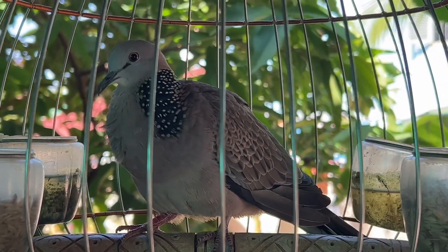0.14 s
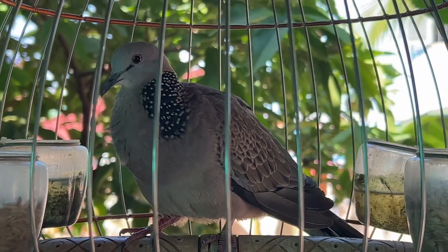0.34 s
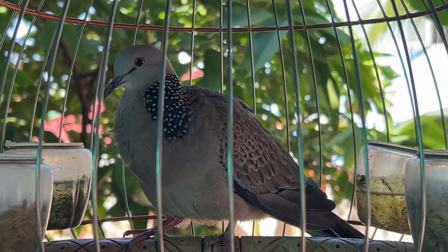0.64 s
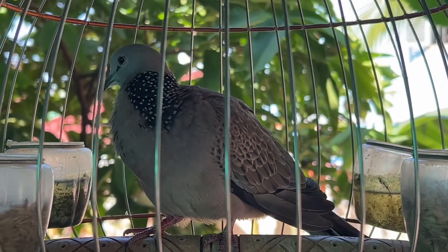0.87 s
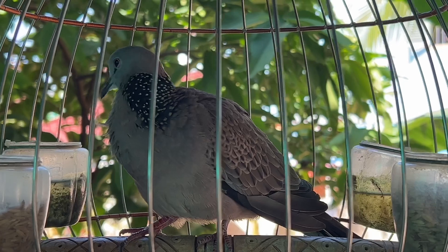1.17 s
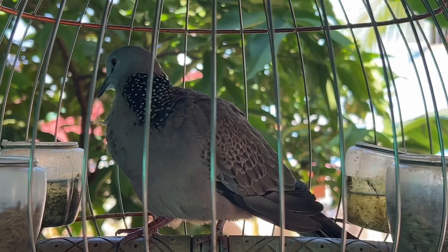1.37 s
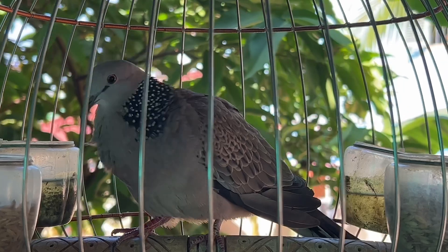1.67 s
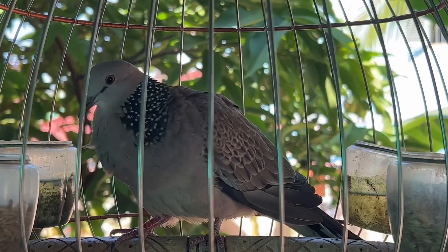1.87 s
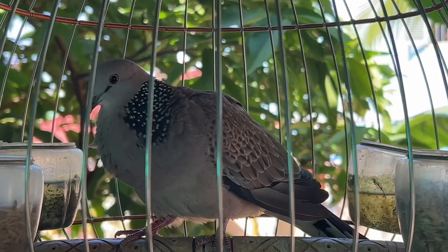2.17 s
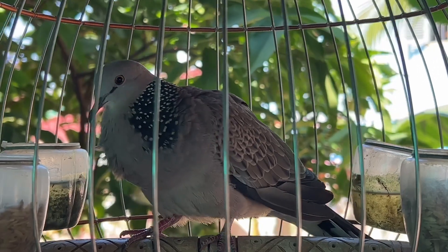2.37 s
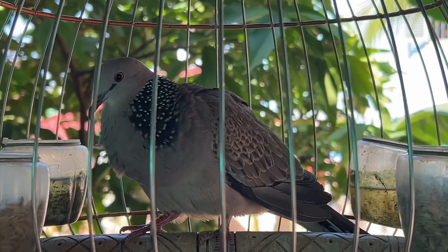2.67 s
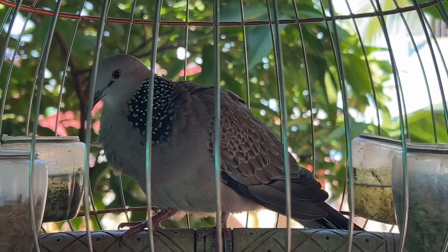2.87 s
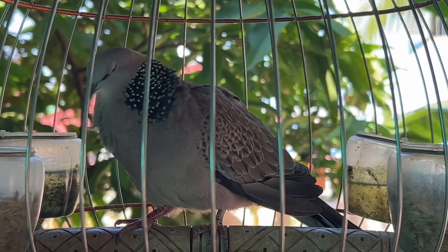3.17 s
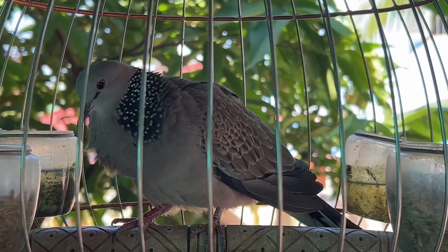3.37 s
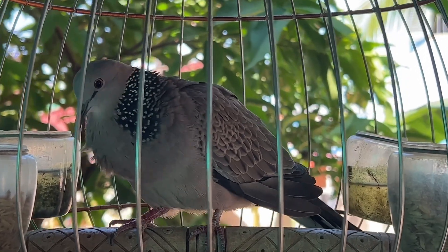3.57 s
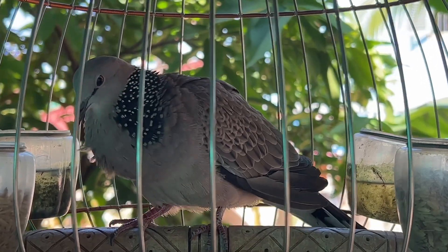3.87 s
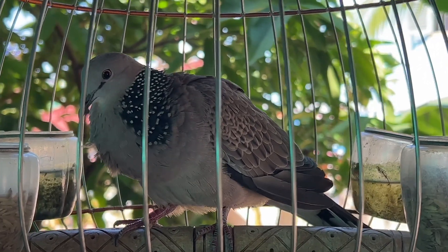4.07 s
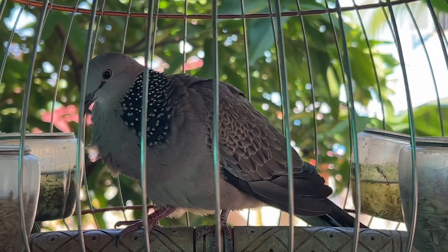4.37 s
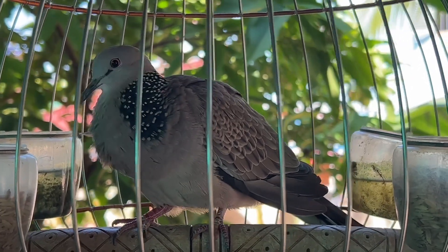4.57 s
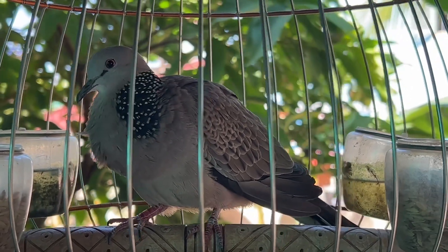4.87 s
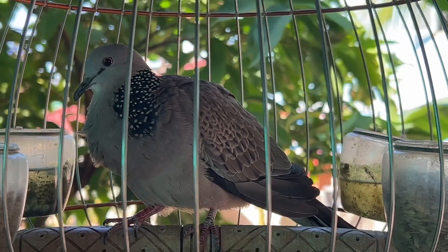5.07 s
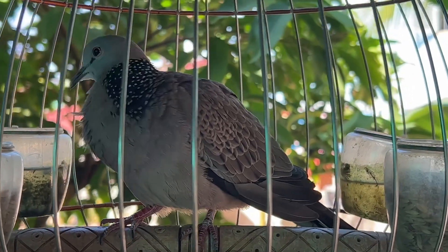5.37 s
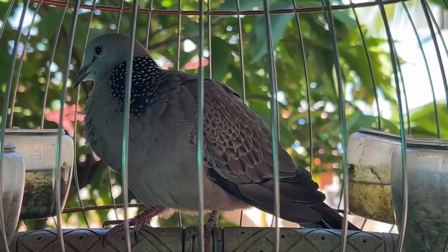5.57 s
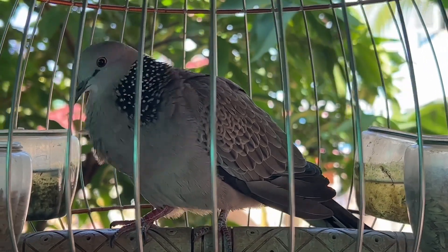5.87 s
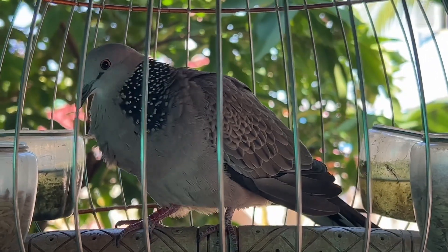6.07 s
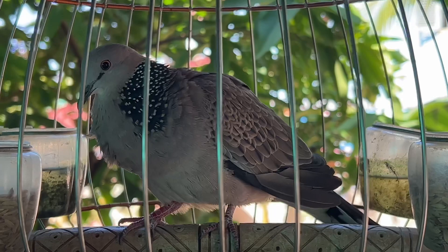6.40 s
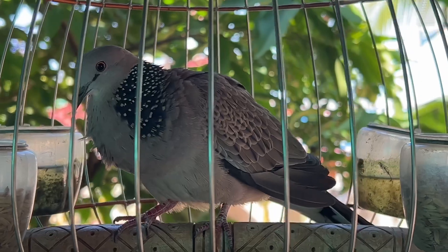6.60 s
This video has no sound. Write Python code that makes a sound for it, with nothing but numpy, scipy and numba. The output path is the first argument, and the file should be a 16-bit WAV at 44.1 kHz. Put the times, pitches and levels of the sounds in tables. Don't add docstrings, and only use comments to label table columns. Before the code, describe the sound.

A close, nearly dry phone pickup in a garden beside a road. Low engine drone and soft traffic wash run throughout, swelling slightly at first and thinning until about 5.5 s. A far hoarse fowl clucks at 0.1 s and gives a wavering call from 0.3 to 0.8 s. The dove's first, softest coo starts at 1.55 s: a brief hop, a fluttered rise at 1.7 s, then a long pulsing trill from 2.05 to 2.6 s, sliding down. Faint bird whistles and dry scuffs overlap it. The second coo runs from 3.2 to 4.2 s. Light metal ticks begin near 5 s, growing into scraping bowl knocks from 5.35 s. The third coo, from 5.75 s to the end, is strongest, with a sharp clank at 5.9 s, ringing cup taps at 6.15 to 6.3 s and 6.7 s, and an engine approaching.

```python
import sys
import numpy as np
from scipy import signal
from scipy.fft import rfft, irfft
from scipy.io import wavfile
from scipy.ndimage import uniform_filter1d
from numba import njit

SR = 44100
rng = np.random.default_rng(int(sys.argv[2]) if len(sys.argv) > 2 else 0)


def transcribe(signal):
    frames = np.atleast_2d(signal).T
    limited = np.clip(frames, -1, 1)
    pcm = np.round(limited * 32767).astype(np.int16)
    wavfile.write(sys.argv[1], SR, pcm)


def undo_db(level):
    steps = np.asarray(level, float) / 20
    return 10 ** steps


N = 297234
T = np.arange(N) / SR

# (time [s], level [dB])
TRAFFIC = [(0.0, 0), (0.5, 1.5), (1.35, -4.5), (2.53, 0), (3.17, -5), (3.62, -8), (4.34, -10), (5.5, -11.5),
           (6.2, -3.5), (6.74, -4)]
# (frequency [Hz], density [dB per Hz])
WASH_COLOUR = [(40, 0), (118, -1), (222, -14), (460, -22.5), (800, -22.5), (1600, -29), (3130, -36.5),
               (6800, -38), (8800, -47), (10200, -51.5), (11600, -53.5), (13500, -50.5), (16500, -59)]
# (frequency [Hz], side level [dB])
WASH_WIDTH = [(40, -33), (110, -16.5), (200, -8.5), (500, -2), (1300, 0), (2400, -7.5), (4400, -25.5),
              (8000, -13)]
# (time [s], firing rate [Hz], level [dB])
LEAVING = [(0.0, 26.8, -43), (0.8, 26.5, -43), (1.5, 26.2, -41), (2.0, 25.0, -43), (2.5, 24.0, -52)]
WAITING = [(1.8, 21.5, -52), (2.3, 20.5, -47), (2.9, 20.2, -42), (3.35, 19.6, -43), (3.7, 20.0, -49),
           (4.4, 20.1, -52), (4.7, 20.3, -60)]
COMING = [(3.6, 34.93, -51.5), (4.4, 36.78, -47), (5.12, 38.4, -48.5), (5.98, 38.45, -49),
          (6.54, 39.85, -36), (6.74, 38.97, -33.5)]
IDLING = [(0, 52.9, -42), (1.0, 52.5, -39), (2.2, 53.3, -46)]
# (multiple [-], level [dB])
LEAVING_ORDERS = [(1, -18.5), (2, -7.5), (3, -6), (4, -3.5), (5, -4), (6, -1.5), (7, -9), (8, -20)]
WAITING_ORDERS = [(2, -7.5), (3, -11.5), (4, -6), (5, -0.5), (6, -1.5), (7, -6), (8, -9), (9, -13)]
COMING_ORDERS = [(1, -10), (2, 0.5), (3, -16), (4, -7.5), (5, -21.5), (6, -29)]
# (time [s], pitch [Hz], level [dB], second harmonic level [dB])
FOWL_CALLS = [
    [(.13, 505, -50, -60), (.155, 519.5, -46, -51), (.18, 502, -60, -62)],
    [(.31, 538, -42, -36), (.365, 534, -39, -37), (.392, 548, -43, -36), (.425, 541, -50, -47),
     (.45, 559, -44, -50), (.52, 560, -44.5, -47), (.57, 572, -40.5, -43), (.63, 569, -42.5, -47),
     (.7, 544, -42, -54), (.752, 502.6, -46, -54), (.8, 432.5, -49.5, -60)],
]
# (time [s], pitch [Hz], level [dB])
WHISTLES = [
    [(1.67, 1537, -65), (1.682, 1614, -39), (1.724, 1757, -40), (1.8, 1683, -49)],
    [(1.9, 1577, -45), (1.948, 1732, -45), (1.975, 1670, -57), (1.995, 1600, -48.5)],
    [(2.11, 1732, -66), (2.124, 1684, -40), (2.16, 1830, -59)],
    [(2.24, 1740, -58), (2.268, 1796, -52.5), (2.402, 1740, -47), (2.48, 1648, -65)],
]
# (time [s], level [dB])
HOPS = [
    (1.548, -3),
    (3.199, 1),
    (5.748, 0.5),
]
# (time from hop start [s], pitch [Hz], level [dB])
HOP_SHAPE = [(-.007, 335.5, -47), (.001, 396, -32.5), (.013, 475, -25.5), (.028, 509, -18.5),
             (.046, 522, -16), (.068, 507, -18), (.082, 465, -28.5)]
# (time [s], pitch [Hz], level [dB])
RISES = [
    [(1.728, 440, -34), (1.762, 555, -18.5), (1.795, 566, -15.5), (1.835, 574.3, -14), (1.853, 562, -14),
     (1.877, 530.4, -15), (1.884, 480, -26.5), (1.891, 411, -39)],
    [(3.343, 449.8, -33.5), (3.38, 535, -19.5), (3.41, 572, -14), (3.445, 566, -15), (3.468, 555, -17),
     (3.49, 528.7, -15), (3.498, 479, -28), (3.506, 411, -39.5)],
    [(5.919, 440, -33.5), (5.955, 535, -17.5), (5.99, 566.3, -14), (6.025, 580.4, -10.5), (6.05, 565, -13),
     (6.072, 525, -15), (6.077, 481, -26.5), (6.083, 410.6, -39.5)],
]
# (time [s], pitch [Hz], level [dB])
LONGS = [
    [(2.05, 500, -26), (2.084, 590, -13.5), (2.11, 618, -9.5), (2.19, 628, -9.5), (2.258, 612, -10),
     (2.285, 580, -14.5), (2.43, 507, -19), (2.55, 463, -30.5), (2.625, 432, -34)],
    [(3.675, 500, -26.5), (3.709, 600, -13.5), (3.735, 630, -9), (3.815, 634, -10), (3.9, 605, -10.5),
     (3.965, 554, -14.5), (4.055, 510, -17.5), (4.145, 477, -26), (4.215, 440, -34.5)],
    [(6.247, 512, -25), (6.281, 595, -12), (6.32, 648, -8), (6.38, 640, -8.5), (6.47, 615, -9.5),
     (6.51, 555, -14.5), (6.6, 517, -17.5), (6.68, 486, -24), (6.76, 455, -31.5)],
]
# (time [s], share shut [0-1], length [s])
TRILL_PINCHES = [(2.071, 0.76, 0.0059), (2.0932, 0.79, 0.011), (2.118, 0.84, 0.011), (2.1395, 0.73, 0.013),
                 (2.164, 0.78, 0.012), (2.1876, 0.88, 0.011), (2.2105, 0.74, 0.011), (2.2302, 0.93, 0.008),
                 (2.248, 0.57, 0.0041), (2.269, 0.61, 0.009), (2.286, 0.5, 0.0064), (2.307, 0.7, 0.0054),
                 (2.322, 0.51, 0.0064), (2.338, 0.3, 0.0049), (2.348, 0.2, 0.0064), (2.367, 0.16, 0.0072),
                 (2.381, 0.24, 0.0062), (3.6967, 0.71, 0.0062), (3.7182, 1, 0.01), (3.743, 0.88, 0.0112),
                 (3.765, 0.85, 0.0114), (3.786, 0.93, 0.011), (3.8071, 0.95, 0.0063), (3.8292, 0.79, 0.011),
                 (3.8474, 0.8, 0.0064), (3.867, 0.86, 0.0089), (3.885, 0.71, 0.0063), (3.902, 0.75, 0.0052),
                 (3.92, 0.1, 0.0037), (3.9327, 0.8, 0.0064), (3.948, 0.5, 0.0059), (3.9624, 0.22, 0.0045),
                 (3.975, 0.22, 0.006), (3.991, 0.34, 0.0045), (4.021, 0.1, 0.0072), (6.2712, 0.84, 0.0064),
                 (6.29, 1, 0.0085), (6.3116, 0.99, 0.0099), (6.3345, 0.89, 0.0109), (6.3572, 0.82, 0.011),
                 (6.3808, 0.95, 0.0113), (6.4033, 0.98, 0.012), (6.4222, 0.67, 0.008),
                 (6.4412, 0.8, 0.0049), (6.4602, 0.78, 0.0076), (6.479, 0.79, 0.008), (6.514, 0.2, 0.02),
                 (6.575, 0.1, 0.008), (6.64, .12, 0.012)]
FLUTTER_PINCHES = [(1.7347, 0.42, 0.0017), (1.7486, 0.65, 0.0019), (1.762, 0.67, 0.0026),
                   (1.772, 0.54, 0.0059), (1.785, 0.34, 0.0037), (3.337, 0.67, 0.0051),
                   (3.351, 0.75, 0.0026), (3.3625, 0.36, 0.0025), (3.3761, 0.51, 0.0046),
                   (3.387, 0.47, 0.0046), (3.4002, 0.71, 0.0041), (3.4115, 0.69, 0.0041),
                   (3.4214, 0.37, 0.0053), (5.9084, 0.55, 0.003), (5.917, 0.62, 0.0021),
                   (5.9253, 0.64, 0.0017), (5.9374, 0.41, 0.0038), (5.9525, 0.61, 0.0051),
                   (5.9626, 0.22, 0.0037), (5.9723, 0.24, 0.0045), (5.982, 0.24, 0.0039)]
CLOSING_PINCHES = [(1.626, 0.62, 0.013), (1.864, 0.48, .013), (3.265, 0.3, .005), (3.287, .7, .005),
                   (3.298, .6, .004), (3.31, 0.55, 0.0043), (3.476, 0.23, 0.02), (5.83, .65, 0.01),
                   (6.061, 0.4, 0.014)]
# (time [s], frequency [Hz], level [dB], T60 [s])
PINGS = [(2, 5900, -51, 0.074), (4.984, 2470, -49, 0.16), (4.99, 1340, -57, 0.27), (4.986, 3850, -53, .5),
         (4.99, 3780, -56, .45), (5.04, 3820, -55, .3), (4.4, 6627, -55, .2), (4.985, 6400, -55, 0.13),
         (5.322, 7640, -53, 0.23), (5.354, 4350, -47, .15), (5.56, 11730, -54.5, 0.43),
         (5.14, 7000, -59, 0.25), (5.178, 7500, -60, 0.28), (5.43, 2450, -43, 0.14),
         (5.512, 2300, -45, 0.16), (5.44, 1910, -47, .14), (5.395, 3860, -48, .45), (5.558, 1868, -43, .35),
         (5.56, 3500, -46, .3), (5.57, 4350, -46, .25), (5.783, 1776, -53, .3), (5.888, 4290, -34, .3),
         (5.888, 4194, -40, .3), (5.895, 3800, -39.5, .4), (5.89, 2480, -40.5, .4), (5.89, 1868, -44.5, .4),
         (5.892, 3480, -42, .25), (5.9, 6605, -43.5, .3), (5.6, 5530, -54, .5), (5.648, 5545, -49, .14),
         (6.045, 5290, -52, .4), (6.075, 5290, -51, 0.3), (6.18, 9250, -41, 0.25), (6.7, 4160, -39, .13),
         (6.21, 5260, -49.5, .35), (6.16, 4200, -39.5, .2), (6.162, 4570, -44, .2),
         (6.283, 2370, -45.5, 0.43), (6.275, 4570, -47, .4), (4.982, 2480, -56, .4), (5.36, 1900, -50, .25),
         (5.0, 5500, -56, .15)]
# (time [s], level [dB], decay [s], centre [Hz])
SCUFFS = [(2.021, -45, 0.058, 3790), (2.283, -45.5, 0.065, 4340), (2.556, -51, 0.21, 1150),
          (2.72, -54.5, .3, 1240), (3.495, -61.5, 0.097, 5950), (4.159, -52.5, 0.03, 3970),
          (4.638, -48.5, 0.043, 4500), (5.36, -51, .12, 2300), (5.558, -49, .06, 2400),
          (5.888, -41, .08, 2700), (5.888, -43, .07, 6200), (6.04, -50, .08, 2600), (6.158, -49, .07, 4600),
          (6.28, -51, .12, 3600), (5.41, -54, 1, 4366), (5.942, -31, 0.023, 11100)]
PLACES = ["edge", "rim", "wall", "base"]
# (frequency [Hz], level struck at edge [dB], rim [dB], wall [dB],
# base [dB])
BOWL_MODES = [(1330, -15, -20, -30, -32), (1865, -26, -8, -3, -6), (1933, -29, -8, -13, -16),
              (2290, -22, -16, -18, -18), (2470, -9, -8, -8, -6), (3510, -15, -10, -4, -8),
              (3645, -26, -18, -21, -12), (3725, -13, -11, -23, -16), (3805, -2, -18, -11, 0),
              (3855, 0, 0, -21, -6), (4185, -30, -16, -11, -4), (4290, -31, -10, -7, 6),
              (4350, -33, 3, -6, -8), (4450, -28, -6, -18, -10),
              (5290, -29, -18, -7, -18), (5520, -14, -5, -7, -13), (6220, -31, -10, -12, -24),
              (6380, -33, -5, -14, -17), (6610, -16, -14, -17, -5), (6900, -32, -8, -16, -13),
              (7300, -23, -12, -21, -14), (8055, -35, -10, -9, -18), (8385, -33, -2, -17, -9),
              (10980, -28, -23, -29, -27), (11730, -22, -12, -10, -22), (14300, -45, -45, -30, -42)]
CUP_MODES = [(2000, -19, -28, -28, -24), (2370, -20, -19, -19, -19), (4175, -21, -6, -28, -26),
             (4568, -16, -6, -13, -24), (4915, -16, -14, -20, -21), (5260, -18, -8, -15, -18),
             (6945, -17, -10, -12, -3), (6998, -5, -7, -9, 0), (7060, -28, -24, -14, -3),
             (7630, 0, -10, 0, -4), (7690, -23, -36, -7, -10), (8685, -21, -25, -5, -18),
             (9200, -1, 0, -18, -20), (10420, -17, -45, -29, -28), (10575, 0, -19, -29, -16),
             (11185, -45, -16, -2, -7), (11270, -45, -18, -21, -14), (14630, -17, -29, -29, -23),
             (14870, -36, -27, -20, -16)]
# (time [s], place struck, level [dB], chatter [s], T60 [s], grind level [dB])
BOWL_KNOCKS = [(4.979, "edge", -52, 0.013, 0.23, -26), (5.149, "rim", -67, 0.082, 0.25, -19),
               (5.356, "rim", -46.5, 0.031, 0.23, 5), (5.392, "rim", -42.5, 0.021, 0.18, -2),
               (5.432, "wall", -52, 0.012, .11, 2), (5.48, "rim", -57, 0.023, .12, 0),
               (5.525, "edge", -51.5, .01, 0.15, -9), (5.555, "wall", -39.5, 0.016, 0.16, -2.5),
               (5.615, "wall", -54.5, .01, 0.17, -8), (5.655, "rim", -70, 0.0105, 0.18, -6),
               (5.884, "base", -29, 0.014, 0.17, -6.5), (5.912, "base", -37.5, 0.008, 0.12, 0),
               (5.935, "edge", -36.5, 0.0086, 0.12, 0), (5.955, "wall", -45, 0.018, 0.13, 7),
               (5.989, "base", -54, .01, .12, -5), (6.041, "rim", -53, 0.025, 0.14, 5.5)]
CUP_KNOCKS = [
    (5.775, "edge", -36, 0.0068, 0.71, -10),
    (6.156, "rim", -36.5, 0.008, 0.23, -3),
    (6.271, "base", -36.5, 0.018, 0.25, -7),
    (6.305, "wall", -32.5, 0.026, 0.18, -10),
    (6.696, "base", -42.5, 0.0048, 0.26, -5),
]
# (frequency [Hz], left lead [rad])
PORT_LEAD = [(0, 0), (8950, 0), (9600, -3.05), (10430, -3.3), (10750, -4.1), (11800, -6.3), (12500, -6.2),
             (13300, -9.2), (14400, -9.8), (15200, -12.6)]
# (frequency [Hz], gain [dB])
HOUSING = [(25, -23.5), (45, 0), (15500, 4), (16000, -26.5)]


def walk(rate_hz):
    k = int(SR / rate_hz)
    held = np.repeat(rng.standard_normal(N // k + 1), k)
    return 1.39 * uniform_filter1d(uniform_filter1d(held, k), k)[:N]


def band(x, hz, octaves):
    edges = np.clip(hz * 2 ** (np.array([-.5, .5]) * octaves), 10, .49 * SR)
    sos = signal.butter(2, edges, "band", fs=SR, output="sos")
    return signal.sosfilt(sos, x) / np.sqrt(np.ptp(edges) / (SR / 2))


def tone(hz, multiple=1):
    phase = 2 * np.pi * multiple * np.cumsum(hz) / SR
    return np.sqrt(2) * np.sin(phase + 2 * np.pi * rng.random())


def track(spans, off_db=-110, gap_s=.02):
    rows = []
    for k, span in enumerate(spans):
        first, last = span[0], span[-1]
        off = (off_db,) * (len(first) - 2)
        if k == 0 or first[0] - spans[k - 1][-1][0] > gap_s:
            rows.append((first[0] - .007, first[1]) + off)
        rows += span
        if k == len(spans) - 1 or spans[k + 1][0][0] - last[0] > gap_s:
            rows.append((last[0] + 0.01034, last[1]) + off)
    s, *columns = np.transpose(rows)
    return [np.interp(T, np.maximum.accumulate(s), c) for c in columns]


def on_log_hz(hz, table):
    table_hz, db = np.transpose(table)
    return np.interp(np.log(hz), np.log(table_hz), db)


def road():
    near_db = np.interp(T, *np.transpose(TRAFFIC))
    rumble_lag_s = 2.6
    rumble_db = -44 + 0.77 * uniform_filter1d(near_db, size=int(rumble_lag_s * SR))
    roar_db = -54.5 + near_db
    hiss_db = -58.5 + 0.96 * near_db
    out = 0
    for hz in 30 * 2 ** np.arange(0, 9.2, .5):
        if hz < 250:
            level_db, ref_hz = rumble_db, 100
        elif hz < 1800:
            level_db, ref_hz = roar_db, 1000
        else:
            level_db, ref_hz = hiss_db, 4500
        level_db = level_db + 1.2 * (hz > 9000) * (hiss_db - hiss_db[0])
        colour_db = on_log_hz(hz, WASH_COLOUR) - on_log_hz(ref_hz, WASH_COLOUR) + 10 * np.log10(hz / ref_hz)
        mid = band(rng.standard_normal(N), hz, 0.51)
        side = undo_db(on_log_hz(hz, WASH_WIDTH)) * band(rng.standard_normal(N), hz, 0.51)
        gain = undo_db(level_db + colour_db + walk(9.6))
        out = out + gain * (mid + side * np.array([[1], [-1]]))
    return out


def engine(run, orders, sway_db=1.8):
    hz, db = track([run])
    hz = hz * (1 + 0.0033 * walk(5.99))
    return undo_db(db) * sum(undo_db(d + sway_db * walk(3.11)) * tone(hz, multiple=m) for m, d in orders)


def far_birds():
    hz, db, octave_db = track(FOWL_CALLS)
    hz = hz * (1 + .014 * walk(90))
    fowl = undo_db(db) * (0.85 + 0.3 * walk(130)) * tone(hz)
    fowl = fowl + undo_db(octave_db) * (0.6 + .25 * walk(160)) * tone(hz, multiple=2)
    hz, db = track(WHISTLES)
    return fowl + undo_db(db) * (0.63 + 0.16 * walk(90)) * tone(hz * (1 + 0.0064 * walk(50)))


def phrases():
    out = []
    for (s, hop_db), rise, long_note in zip(HOPS, RISES, LONGS):
        hop = [(s + u, hz, db + hop_db) for u, hz, db in HOP_SHAPE]
        hop_end_s = hop[-1][0]
        wait_s = rise[0][0] - hop_end_s
        slack = (hop_end_s + wait_s / 2, 555 - 2100 * wait_s, -4 - 440 * wait_s)
        out += [hop + [slack] + rise, long_note]
    return out


def valve():
    overshoot, squareness = 1.12, 2.646
    open_share = np.ones(N)
    for s, shut, length_s in TRILL_PINCHES + FLUTTER_PINCHES + CLOSING_PINCHES:
        near = slice(int((s - .03) * SR), int((s + .03) * SR))
        off = 2 * np.abs(T[near] - s) / length_s
        open_share[near] *= 1 - overshoot * min(shut, 1) * .5 ** (off ** squareness)
    return uniform_filter1d(open_share, size=50)


def dove(octave_db=-58):
    sung = []
    for rows in phrases():
        s, end_hz, end_db = rows[-1]
        sung.append(rows + [(s + 0.009, 0.86 * end_hz, end_db - 4)])
    hz, db = track(sung)
    open_share = valve()
    sag = .13 * (1 - open_share)
    slide = 3.2 * np.gradient(uniform_filter1d(open_share, size=200))
    hz = hz * (1 - sag - slide) * (1 + 0.005 * walk(90))
    air = undo_db(np.minimum(db - 8.0, -50)) * band(rng.standard_normal(N), 625, 0.11)
    leak_db = np.minimum(db - 8, octave_db - .05 * (hz - 500))
    slack = 0
    for (s, _), rise in zip(HOPS, RISES):
        rise_s = rise[0][0]
        slack = slack + np.interp(T, [s + .075, s + .09, rise_s, rise_s + .02], [0, 1, 1, 0])
    leak_db = leak_db + 5 * slack
    open_share = open_share * (1 + .38 * slack * walk(150))
    half_shut = 4 * np.clip(open_share * (1 - open_share), 0, 1)
    rasp = undo_db(db - 33.5) * half_shut * band(rng.standard_normal(N), 796, 0.32)
    voice = undo_db(db + .3 * walk(70)) * tone(hz)
    octave = undo_db(leak_db + 4.1 * walk(30)) * tone(hz, multiple=2)
    return rasp + open_share * (air + voice + octave)


def pings():
    attack_s = .005
    out = np.zeros(N)
    for s, hz, db, t60_s in PINGS:
        u = np.clip(T - s, 0, 1)
        waver_db, drift = 3.2 * walk(90), .004 * walk(60)
        out += undo_db(db + waver_db - 60 * u / t60_s) * (1 - np.exp(-u / attack_s)) * tone(hz * (1 + drift))
    return out


def scuffs():
    out = np.zeros(N)
    for s, db, decay_s, centre_hz in SCUFFS:
        u = np.clip(T - s, 0, 1)
        shape = (1 - np.exp(-u / 0.00082)) * np.exp(-u / decay_s)
        out += undo_db(db + 3.2 * walk(70)) * shape * band(rng.standard_normal(N), centre_hz, 1.57)
    return out


def knocks(modes, hits):
    out = np.zeros(N)
    t = np.arange(SR // 2) / SR
    short = slice(0, SR // 5)
    for s, place, db, chatter_s, t60_s, grind_db in hits:
        grit = rng.standard_normal(len(t)) * (1 - np.exp(-t / 0.011))
        sparse = rng.random(len(t)) < .06
        taps = grit * sparse * (np.exp(-t / chatter_s) + 0.21 * np.exp(-t / 0.066))
        ring = 0
        for hz, *levels_db in modes:
            push = np.abs(np.sum(taps[short] * np.exp(2j * np.pi * hz * t[short])))
            push = max(push, 0.53 * np.sqrt(np.sum(taps ** 2)))
            push *= max(abs(np.cos(np.interp(hz, *np.transpose(PORT_LEAD)) / 2)), .35)
            mode_t60_s = .8 * np.clip(t60_s, .1, .38) * (hz / 5000) ** -.2
            fade = np.exp(-np.log(1000) * t / mode_t60_s)
            fade *= 1 + .45 * np.cos(2 * np.pi * (rng.uniform(8, 35) * t + rng.random()))
            gain = undo_db(0.71 * levels_db[PLACES.index(place)]) / push
            ring = ring + gain * np.sin(2 * np.pi * hz * t) * fade
        held = ring * t * np.exp(-t / .0011)
        held = held / np.sqrt(np.sum(held ** 2))
        slip_db = 2.2 * np.repeat(rng.standard_normal(len(t) // 200 + 1), 200)[:len(t)]
        rub = grit * undo_db(slip_db) * np.exp(-t / (chatter_s + 0.022))
        grind = signal.fftconvolve(rub, held)[:len(t)]
        struck = signal.fftconvolve(taps[short], ring)[:len(t)]
        hit = undo_db(db) * (struck + undo_db(grind_db) * grind)
        i = int(s * SR)
        out[i:i + len(t)] += hit[:N - i]
    return out


@njit
def walls(x, lags, gain, damp):
    line, soft, out = np.zeros((8, 8192)), np.zeros(8), np.zeros((2, len(x)))
    for i in range(len(x)):
        total = 0.
        for k in range(8):
            soft[k] += (1 - damp) * (gain[k] * line[k, (i - lags[k]) & 8191] - soft[k])
            total += soft[k]
            out[k % 2, i] += soft[k]
        for k in range(8):
            line[k, i & 8191] = x[i] + soft[k] - total / 4
    return out


def scene():
    motors = engine(LEAVING, LEAVING_ORDERS) + engine(WAITING, WAITING_ORDERS)
    motors = motors + engine(COMING, COMING_ORDERS) + engine(IDLING, [(0.99, 0.0091)])
    far, bird = far_birds(), dove()
    metal = pings() + scuffs() + knocks(BOWL_MODES, BOWL_KNOCKS) + knocks(CUP_MODES, CUP_KNOCKS)
    sent = undo_db(-23.5) * bird + undo_db(-8) * far + undo_db(-11.0) * metal + undo_db(-26.0) * motors
    yard_t60_s, yard_damp = 0.3, 0.13
    lags = rng.integers(250, 2000, 8)
    yard = walls(sent, lags, undo_db(-60 * lags / SR / yard_t60_s), yard_damp)
    slap_s = .0125
    slap = undo_db(-16.5) * np.roll(bird, int(slap_s * SR)) * np.array([[.6], [1.4]])
    return bird + slap + far + metal + motors + yard + road()


def band_limit(x):
    return signal.sosfilt(signal.butter(12, 16760, fs=SR, output="sos"), x)


def record(dry):
    hz = np.fft.rfftfreq(N, 1 / SR)
    left, right = rfft(dry) * undo_db(np.interp(hz, *np.transpose(HOUSING)))
    mid = (left + right) / 2
    side = (left - right) / 2 * undo_db(np.interp(hz, [3500, 4800, 8500, 9500], [0, -3.5, -5, -12]))
    both = (mid + np.array([side, -side])) * undo_db([[-.15], [.15]])
    lead_rad = np.interp(hz, *np.transpose(PORT_LEAD))
    mix = irfft(both * np.exp(.5j * np.array([lead_rad, -lead_rad])), N)
    return band_limit(mix)


dry = scene()
out = record(dry)
transcribe(out)
```